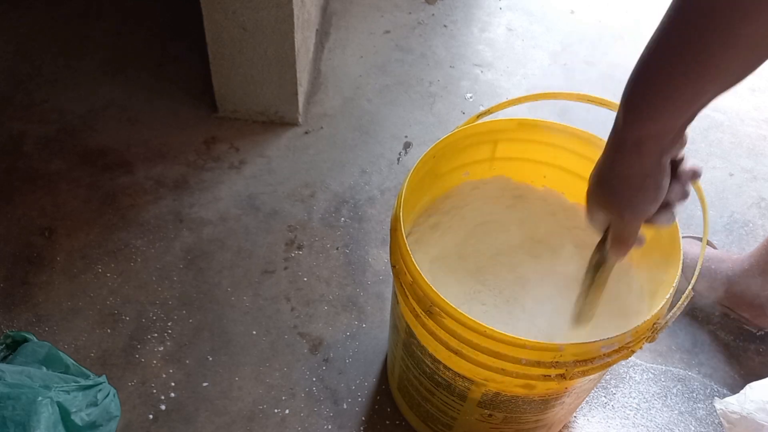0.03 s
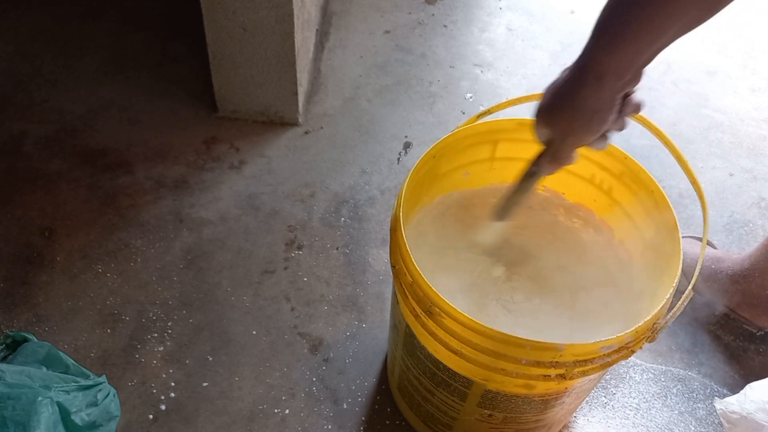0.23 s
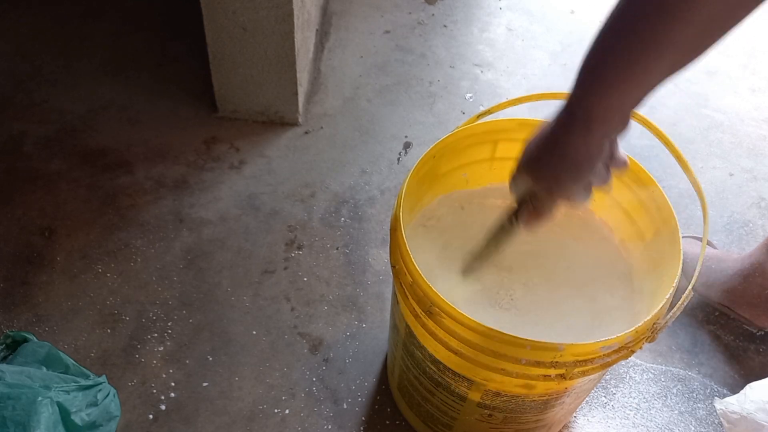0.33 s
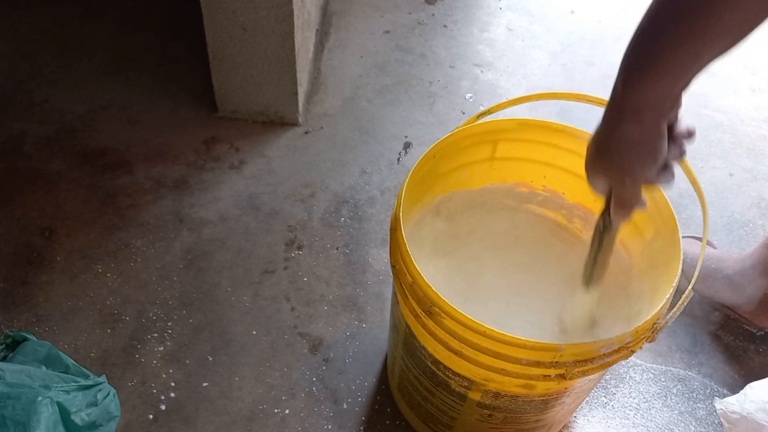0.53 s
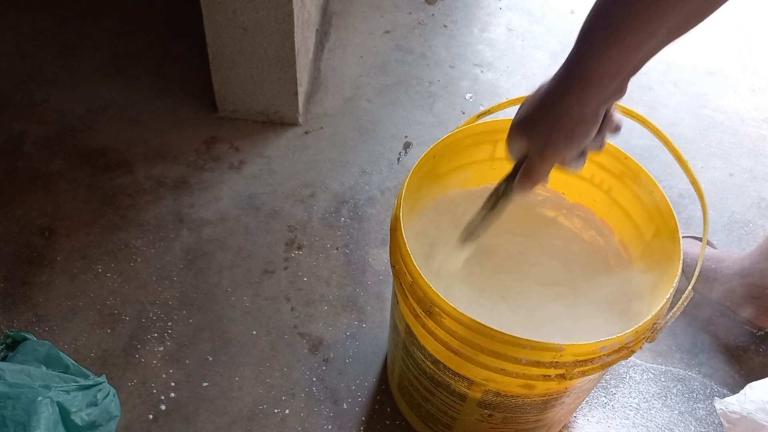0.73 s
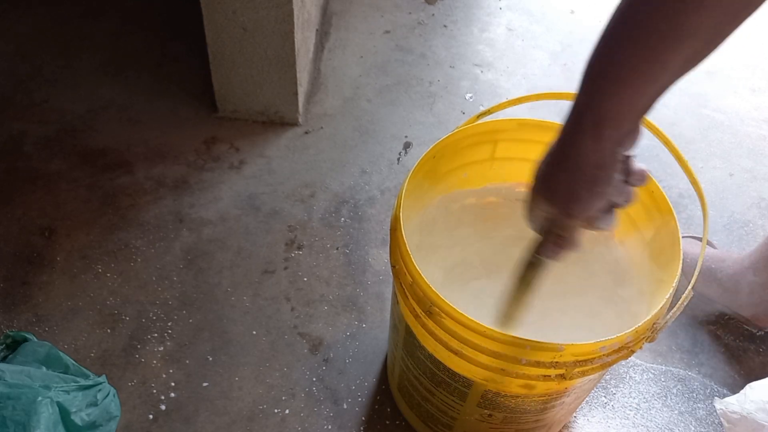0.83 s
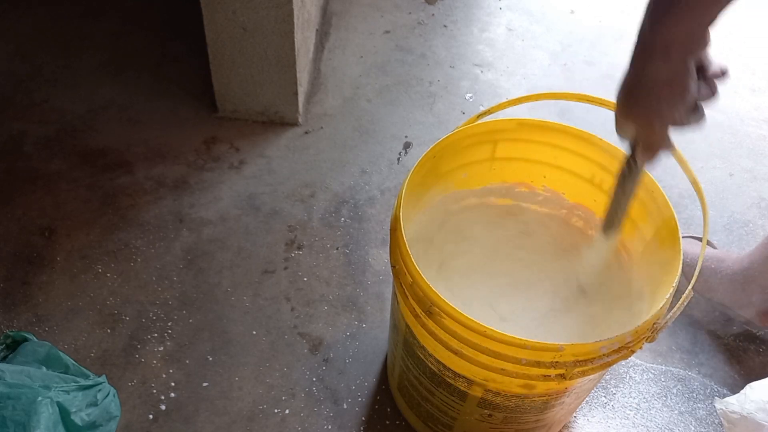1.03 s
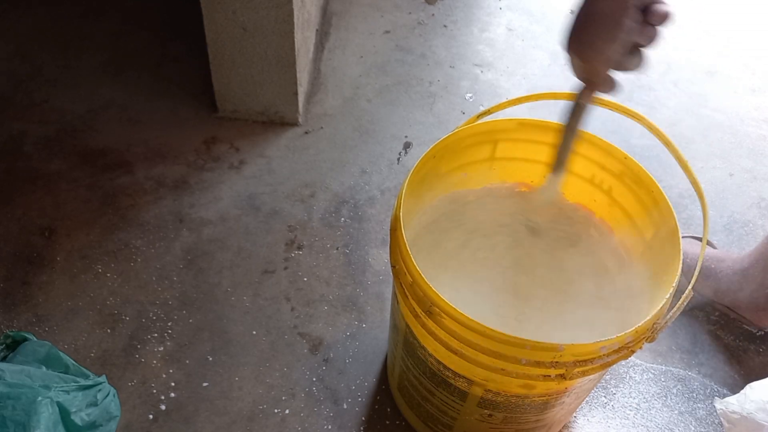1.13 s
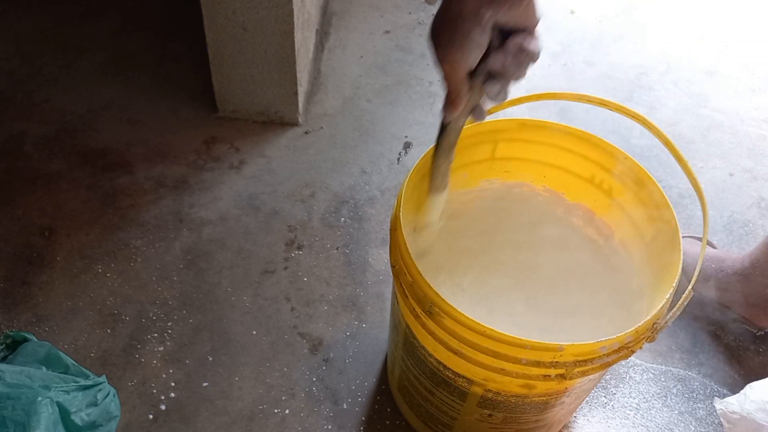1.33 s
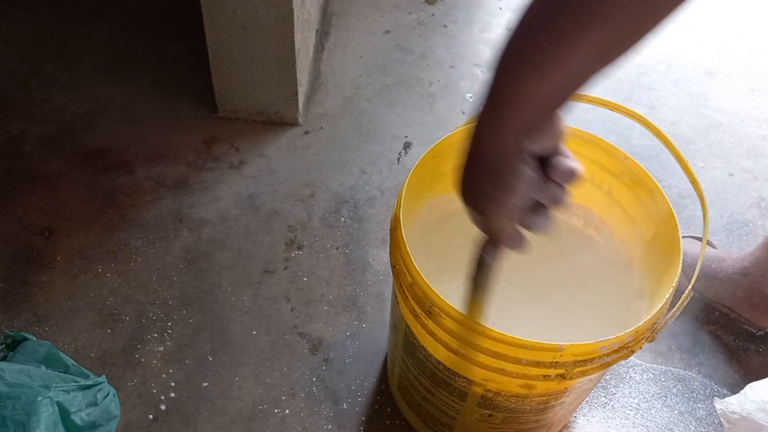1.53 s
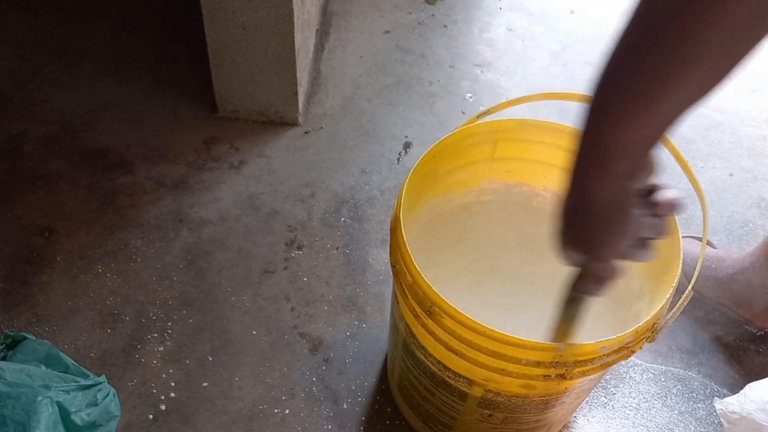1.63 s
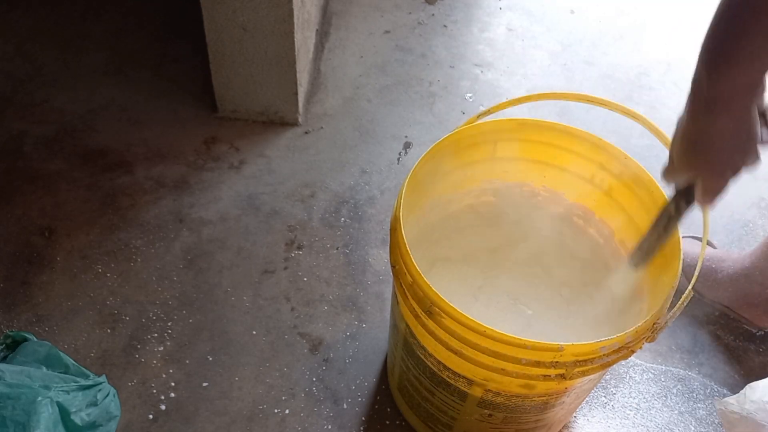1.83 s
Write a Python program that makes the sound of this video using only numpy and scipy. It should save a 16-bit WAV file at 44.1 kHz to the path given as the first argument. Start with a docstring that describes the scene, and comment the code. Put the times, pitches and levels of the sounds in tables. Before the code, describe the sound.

Close stereo pickup of a bucket being stirred indoors: dull mid-low wall booms, one with a sharp woody clack, bubbly slosh and small plips, then mostly soft hiss, faint hum and low microphone bumps.

```python
"""Indoors, in a bare room, a stick stirs thick liquid in a plastic bucket. Knocks make the wall boom,
as a stack of swelling and fading tones, and set off a wash of noise; hard contacts add a crack and a ring.
The liquid sloshes as many tiny bubble tones over noise, plips, spits and gurgles, with a churn and a hiss.
Puffs of air push on the microphone as short low waves, and mains equipment hums faintly as steady tones."""
import sys
import numpy as np
from scipy import signal
from scipy.fft import rfft, irfft, next_fast_len
from scipy.io import wavfile
from scipy.ndimage import map_coordinates

SR = 44100
rng = np.random.default_rng(int(sys.argv[2]) if len(sys.argv) > 2 else 0)


def unload_wav(signal):
    """Save mono or channel-first audio to the path in sys.argv[1] as 16-bit WAV at rate SR, clipped to [-1, 1]."""
    wavfile.write(
        sys.argv[1],
        SR,
        np.round(np.clip(np.atleast_2d(signal).T, -1, 1) * 32767).astype(np.int16),
    )


N = 83790  # length in samples

# stick knocking the wall: start_s, level_db, pitch_hz, swell_s, pressed_s
WALL_KNOCKS = [(-0.035, -22.5, 390.6, 0.017, 0.035), (0.2374, -12.5, 397.8, 0.023, 0.038),
               (0.3991, -15.5, 379, 0.016, 0.015), (0.6877, -16.5, 398.3, 0.026, 0.042)]
# stick grazing or rebounding on the wall: start_s, level_db, pitch_hz
WALL_GRAZES = [(0.316, -26, 381), (0.464, -29.5, 383.7), (0.803, -31, 383), (0.828, -38, 373),
               (1.176, -42, 396.4)]
# tones of the bucket wall: pitch_ratio, level_db
WALL_TONES = [(.58, -25), (.86, -45), (1, 0), (1.335, -24), (1.54, -30.5), (2.56, -35.5)]
# tones of the wet stick: pitch_ratio, level_db, fall_by_60_db_s
STICK_TONES = [(.68, -10.5, 0.014), (1, 2, 0.011), (1.53, -23, 0.077), (2.05, -11, 0.0063)]
# hard contacts of the stick, which chatters as it lands:
# start_s, level_db, ring_hz, crack_db (relative to the ring)
STICK_CLACKS = [(0.2376, -13.5, 1405, -13), (0.398, -29, 1640, -12), (0.4053, -33, 1520, -28),
                (0.4698, -38, 1440, -11), (0.4828, -40, 1500, -14), (0.4891, -40, 1570, -17),
                (0.6877, -26.5, 1650, -16), (0.6915, -24.5, 1680, -17), (0.7593, -37.5, 2200, -19)]
# colour of the crack at contact: frequency_hz, level_db
CRACK_COLOUR = [(200, -28), (700, 8.5), (1500, 17.5), (2400, -6), (3700, 5.5), (5000, -21), (7200, -11),
                (15000, -29)]
# colour of the wash of liquid after a knock: frequency_hz, level_db
WASH_COLOUR = [(100, -32), (160, -9.5), (230, -0.5), (330, -3), (510, 5), (720, -11.5), (980, -6),
               (1250, -9.5), (1600, -25), (2400, -17.5), (4000, -26), (9000, -37.5), (15000, -64)]
# slosh as the stick goes round: time_s, level_db
SLOSH_LEVEL = [(0, -56.5), (.15, -70), (.22, -55), (.38, -65.5), (.45, -52.5), (.485, -47.5), (.52, -74),
               (.58, -70), (.68, -50.5), (.755, -48), (.785, -55.5), (.82, -54), (.89, -59.5), (1.1, -63),
               (1.3, -74.5), (1.45, -66), (1.53, -63.5), (1.69, -58.5), (1.78, -66), (1.9, -69.5)]
# colour of the wet rush under the bubbles: frequency_hz, level_db
SLOSH_COLOUR = [(300, -4.5), (700, -32), (970, 7.5), (1250, 9), (1700, 16), (2400, -9), (4000, 2.5),
                (12000, -37)]
# single bursting bubbles: start_s, level_db, pitch_hz
BURSTS = [(0.065, -46, 896), (.628, -38.5, 1570), (.832, -35.5, 1850), (.948, -40.5, 1224),
          (0.951, -41, 1670), (1.131, -44, 1560), (1.548, -43, 1720)]
# spits of spray and droplets: start_s, level_db, pitch_hz, fall_by_60_db_s
SPITS = [(0.2228, -36.5, 6100, 0.0028), (.2452, -37.5, 7440, 0.0064), (.431, -51, 2280, 0.054),
         (0.447, -44, 2240, 0.085), (.6855, -42, 6500, 0.0073), (.749, -60, 2700, 0.023),
         (1.856, -39, 10200, 0.01)]
# singing air pockets as the liquid closes behind the stick:
# start_s, length_s, level_db, first_hz, last_hz, grain (0 clean to 1 rough)
AIR_POCKETS = [(0.332, 0.037, -45, 320, 215, 0.1), (0.392, 0.0281, -41, 1860, 1253, 0.6),
               (0.403, 0.022, -41, 1045, 920, 0.63), (0.695, 0.016, -42, 930, 945, .6),
               (0.755, 0.011, -39.5, 930, 980, .2), (0.786, 0.01, -43, 930, 1020, .2),
               (0.797, 0.029, -41, 975, 935, 0.12), (1.26, 0.1, -70, 1190, 1160, 0.64),
               (1.434, 0.162, -67, 1633, 1734, 1), (1.51, 0.16, -58.5, 1310, 1335, 0.2),
               (1.641, 0.068, -64, 1596, 1494, .95), (1.655, 0.69, -65, 980, 958, 1)]
# fine hiss of the swirl: time_s, level_db
HISS_LEVEL = [(0, -52), (.05, -57.5), (.17, -56), (.2, -55.5), (.29, -50.5), (.36, -54), (.43, -52.5),
              (.52, -56.5), (.6, -52), (.66, -55), (.77, -50.5), (.9, -56), (.95, -53), (1.1, -55.5),
              (1.2, -50), (1.27, -55.5), (1.42, -56), (1.48, -57.5), (1.57, -58.5), (1.67, -51),
              (1.79, -59), (1.9, -55)]
# colour of that hiss: frequency_hz, level_db
HISS_TINT = [(200, -15), (1000, -6), (3000, 1.5), (5000, 2), (7300, 1.5), (8600, -0.5), (10500, 1),
             (12300, 4), (14000, 0.5), (15800, -0.5)]
# liquid heaving in the bucket: time_s, level_db
CHURN_LEVEL = [(0, -42), (.18, -61.5), (.35, -46.5), (.56, -60.5), (.66, -64.5), (.83, -46.5), (1.07, -63),
               (1.38, -57), (1.55, -61.5), (1.7, -54.5), (1.9, -54.5)]
# colour of that heaving: frequency_hz, level_db
CHURN_COLOUR = [(25, -14), (45, 1.5), (75, -1), (110, 0), (160, -12.5), (250, 4), (310, -1.5), (385, 8.5),
                (500, -3), (650, -10), (1500, -37), (4000, -62)]
# puffs of air on the microphone ports: centre_s, left_db, right_db, pitch_hz, half_length_s
AIR_PUFFS = [(0.087, -56, -49, 82, 0.0087), (0.136, -62, -50.5, 75.4, 0.025), (0.35, -54, -44, 88, 0.015),
             (0.918, -36, -32, 79, 0.0086), (1.312, -48, -44.5, 67, 0.012), (1.387, -81, -50.5, 98, 0.018),
             (1.502, -46.5, -64, 79.5, 0.0083), (1.617, -35, -72, 98, 0.011),
             (1.647, -24, -69, 96.6, 0.011), (1.802, -41.5, -83, 64.4, 0.071), (1.852, -39, -66, 99, 0.012)]
# mains hum tones: pitch_hz, level_db
HUM_TONES = [(242, -72), (360.7, -62.5), (479.5, -66.5)]
# how alike left and right noise are: frequency_hz, likeness (0 unrelated to 1 the same)
LEFT_RIGHT_LIKENESS = [(60, 0.34), (300, 0.8), (600, 0.25), (1500, 0), (3000, 0.03), (6000, 0)]
# how long the room rings: frequency_hz, fall_by_60_db_s
ROOM_FALL = [(100, 0.5), (400, 0.14), (1000, 0.39), (2000, 0.33), (10000, 0.071)]

# A T60 is the time in seconds to fall by 60 dB.
WALL_T60, RELEASE_T60 = 0.35, 0.092  # the wall while pressed; its extra fall once let go
GRAZE_S = 0.0092  # swell and press time of a graze
WASH_DB, WASH_T60, WASH_RISE_S = -23.5, 0.45, 0.0032  # the liquid takes a moment to move
CONTACT_S, CRACK_T60 = 0.00066, 0.017  # rise of a clack's ring, fall of its crack
BUBBLES_PER_S, BUBBLE_HZ, BUBBLE_CYCLES = 600, 1576, 13.5  # slosh bubbles fall by 60 dB in these cycles
BUBBLE_SPREAD = 0.64  # widest pitch shift either way, as a power of e
BUBBLE_RISE = 0.08  # pitch growth in a bubble's phase
ROOM_DB = -15
BUCKET_PAN_DB, HISS_PAN_DB = -0.5, -1  # added on the left, taken away on the right
RIGHT_LEAD_S = 0.00006  # the bucket's sound reaches the right port first
MIC_LOW_HZ, TOP_HZ = 47, 15800  # bass roll-off and upper limit


def amp(db):
    """Turn decibels into a gain."""
    return 10 ** (np.asarray(db) / 20)


def unit(x):
    """Scale a sound to an rms (average strength) of 1."""
    return x / np.sqrt(np.mean(x ** 2) + 1e-20)


def along(points, hz):
    """Read a value between (frequency, value) points on a log frequency axis."""
    frequency, value = np.transpose(points)
    return np.interp(np.log(hz + 1), np.log(frequency + 1), value)


def level(rows):
    """Turn (time, dB) points into a gain for every sample."""
    return amp(np.interp(np.arange(N) / SR, *np.transpose(rows)))


def since(start):
    """Count seconds since a moment, staying at zero before it."""
    return np.maximum(np.arange(N) / SR - start, 0)


def fade(t, t60):
    """Die away exponentially, starting when t leaves zero."""
    return (t > 0) * np.exp(-np.log(1000) * t / t60)


def pan(db):
    """Give the left gain and the opposite right gain."""
    return amp([[db], [-db]])


def filtered(x, response):
    """Multiply the frequencies of a sound by a response."""
    size = next_fast_len(N + SR // 2)
    hz = np.fft.rfftfreq(size, 1 / SR)
    return irfft(rfft(x, size) * response(hz), size)[..., :N]


def rush(spectrum):
    """Make coloured stereo noise of rms 1, mixing two noises to set how alike the sides are."""
    def response(hz):
        turn = np.arccos(np.clip(along(LEFT_RIGHT_LIKENESS, hz), -1, 1)) / 2
        return amp(along(spectrum, hz)) * [np.cos(turn), np.sin(turn)]

    mid, side = filtered(rng.standard_normal((2, N)), response)
    return unit(np.array([mid + side, mid - side]))


def wobble(rate):
    """Draw a smooth random curve through this many random points a second."""
    points = rng.standard_normal(N // 20)
    return map_coordinates(points, [np.arange(N) * rate / SR], mode="wrap")


def bubble(t, hz, cycles):
    """A bubble is a dying tone with a soft start and a rising pitch."""
    life = cycles / hz
    rise = 1 + BUBBLE_RISE * np.minimum(t / life, 1)
    tone = np.sin(2 * np.pi * hz * t * rise)
    return tone * fade(t, life) * (1 - np.exp(-t * hz))


def boom(start, hz, swell, pressed, rough=0.18, apart=0.27):
    """The wall swells while pressed, then the liquid damps it; each port hears it a little differently."""
    t = since(start)
    release = np.exp(-np.log(1000) * np.maximum(t - pressed, 0) / RELEASE_T60)
    shape = np.minimum(t / swell, 1) ** 0.58 * fade(t, WALL_T60) * release
    tones = np.zeros((2, N))
    for ratio, db in WALL_TONES:
        unsteady = 1 + rough * wobble(130.8)
        drift = rough * wobble(130) + apart * np.array([wobble(59.36), wobble(58.2)])
        tones += amp(db) * unsteady * np.sin(2 * np.pi * hz * ratio * t + drift)
    return shape * tones


def knocks():
    """Each knock booms the wall and throws a wash of liquid; a graze only stirs the wall briefly."""
    out = np.zeros((2, N))
    wash = rush(WASH_COLOUR) * amp(1.9 * wobble(150))  # flickers by a few dB
    for start, db, hz, swell, pressed in WALL_KNOCKS:
        t = since(start)
        wash_shape = fade(t, WASH_T60) * (1 - np.exp(-t / WASH_RISE_S))
        out += amp(db) * (boom(start, hz, swell, pressed) + amp(WASH_DB) * wash * wash_shape)
    for start, db, hz in WALL_GRAZES:
        out += amp(db) * boom(start, hz, GRAZE_S, GRAZE_S)
    return out


def slosh(bubbles_db=-3, noise_db=-4):
    """Many small bubbles ring over a wet rush, all following the stroke of the stick."""
    count = int(BUBBLES_PER_S * N / SR)
    start, pitch, size, side = rng.random((count, 4)).T
    t = np.arange(SR // 40) / SR
    hz = BUBBLE_HZ * np.exp(BUBBLE_SPREAD * (2 * pitch - 1))
    loudness = amp(29.0 * size ** 2)  # up to 29 dB apart, mostly quiet
    grains = bubble(t, hz[:, None], BUBBLE_CYCLES) * loudness[:, None]
    at = (start * N).astype(int)[:, None] + np.arange(len(t))
    # add every bubble at its own place in time, shared between left and right
    pair = []
    for gain in (side, 1 - side):
        pair.append(np.bincount(at.ravel(), (grains * gain[:, None]).ravel(), N)[:N])
    bubbles = amp(bubbles_db) * unit(np.array(pair))
    return level(SLOSH_LEVEL) * (bubbles + amp(noise_db) * rush(SLOSH_COLOUR))


def swirl():
    """The liquid heaves as low noise and hisses as fine, flickering noise."""
    churn = level(CHURN_LEVEL) * rush(CHURN_COLOUR)
    hiss = level(HISS_LEVEL) * rush(HISS_TINT) * amp(0.75 * wobble(300))
    return churn + pan(HISS_PAN_DB) * hiss


def hum(waver=0.55):
    """Mains equipment gives faint tones whose phase wavers slightly."""
    out = np.zeros(N)
    for hz, db in HUM_TONES:
        tone = np.sin(2 * np.pi * hz * since(0) + waver * wobble(8.35))
        out += np.sqrt(2) * amp(db) * tone  # the root makes the level an rms
    return out


def plips(cycles=36, tick_width=0.2):
    """Single bubbles burst as dying tones, and spray spits as short narrow bands of noise."""
    out = np.zeros((2, N))
    for start, db, hz in BURSTS:
        out += amp(db) * bubble(since(start), hz, cycles)
    for start, db, hz, t60 in SPITS:
        noise = rng.standard_normal((2, N))
        spit = filtered(noise, lambda f: np.exp(-((f / hz - 1) / tick_width) ** 2))
        out += amp(db) * unit(spit) * fade(since(start), t60)
    return out


def puffs(overtone_db=-12, rough=0.68):
    """Each puff of air is a soft, lopsided low push, with an overtone, that swells and fades."""
    out = np.zeros((2, N))
    for centre, left_db, right_db, hz, half in AIR_PUFFS:
        t = np.arange(N) / SR - centre
        phase = 2 * np.pi * hz * t + rough * wobble(150)
        swell = np.exp(1 - np.sqrt(1 + 2 * (t / half) ** 2))
        push = np.sin(phase) + amp(overtone_db) * np.sin(2 * phase)
        out += amp([[left_db], [right_db]]) * swell * push
    return out


def clacks(apart=0.43):
    """Each hard contact is one sharp crack and a heavily damped ring of the wet stick."""
    out = np.zeros((2, N))
    crack = rush(CRACK_COLOUR)
    for start, db, hz, crack_db in STICK_CLACKS:
        t = since(start)
        ring = np.zeros((2, N))
        for ratio, tone_db, t60 in STICK_TONES:
            phase = rng.normal(0, apart, (2, 1))  # differs left and right
            ring += amp(tone_db) * np.sin(2 * np.pi * hz * ratio * t + phase) * fade(t, t60)
        soft_ring = ring * (1 - np.exp(-(t / CONTACT_S) ** 2))
        out += amp(db) * (soft_ring + amp(crack_db) * crack * fade(t, CRACK_T60))
    return out


def gurgles(grain_per_s=150):
    """Air pockets sing as clean or grainy tones that swell, glide in pitch and close."""
    out = np.zeros(N)
    for start, length, db, first_hz, last_hz, grain in AIR_POCKETS:
        t = since(start)
        progress = np.minimum(t / length, 1)
        phase = 2 * np.pi * t * (first_hz + (last_hz - first_hz) * progress / 2)
        tone = (1 + grain * wobble(grain_per_s)) * np.sin(phase)
        tone += grain * wobble(grain_per_s) * np.cos(phase)
        out += amp(db) * np.sin(np.pi * progress) * tone
    return out


def room(x):
    """A bare room answers with a tail of noise that dies at its own speed in each frequency band."""
    noise = rush([(100, 0.029), (15000, 0)])[:, :SR // 2]  # almost flat colour
    hz, t, bands = signal.stft(noise, SR, nperseg=256)
    dying = bands * fade(t, along(ROOM_FALL, hz)[:, None])
    tail = signal.istft(dying, SR, nperseg=256)[1]
    return signal.fftconvolve(x, tail / np.linalg.norm(tail[0]), axes=1)[:, :N]


def right_first(x):
    """Shift left later and right earlier by half the lead each."""
    sides = np.array([[-1], [1]])
    return filtered(x, lambda hz: np.exp(np.pi * 1j * hz * RIGHT_LEAD_S * sides))


def scene():
    """Put the bucket in its room and add swirl, hum and puffs of air."""
    bucket = knocks() + slosh() + plips() + clacks() + gurgles()
    bucket = right_first(pan(BUCKET_PAN_DB) * bucket)
    return bucket + amp(ROOM_DB) * room(bucket) + swirl() + hum() + puffs()


def record(dry):
    """The microphone weakens the deepest bass and keeps nothing above its upper limit."""
    def response(hz):
        bass_cut = hz ** 2 / np.sqrt(hz ** 4 + MIC_LOW_HZ ** 4)
        return (hz < TOP_HZ) * bass_cut

    return filtered(dry, response)


dry = scene()
out = record(dry)
unload_wav(out)
```